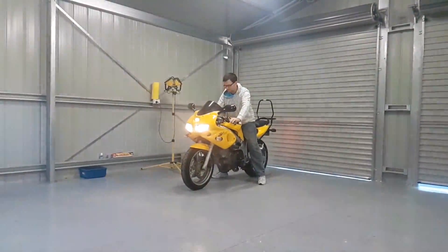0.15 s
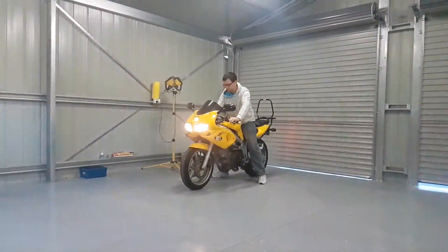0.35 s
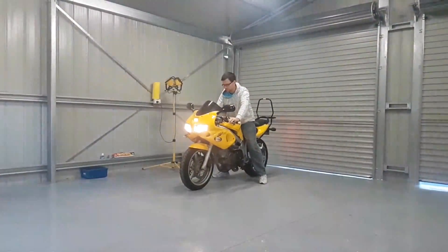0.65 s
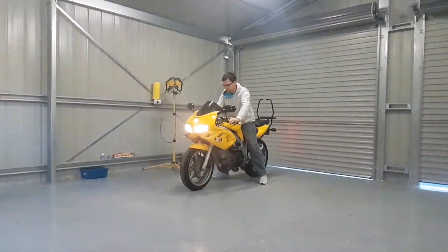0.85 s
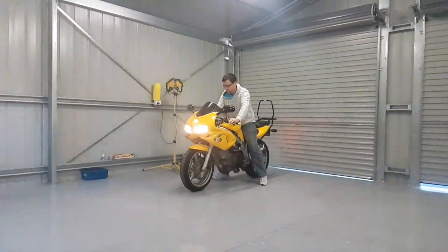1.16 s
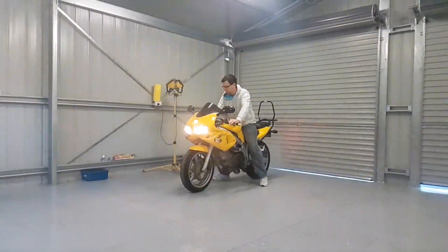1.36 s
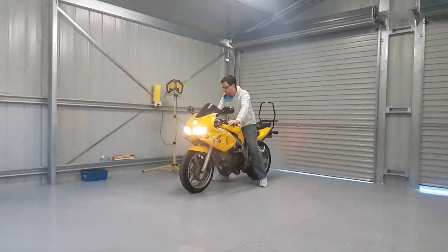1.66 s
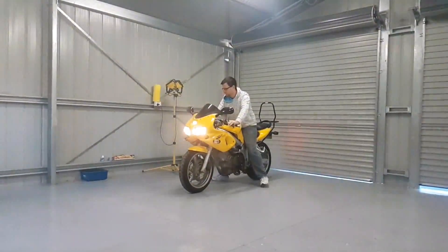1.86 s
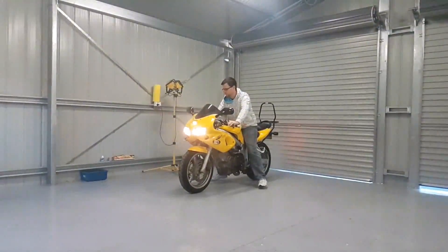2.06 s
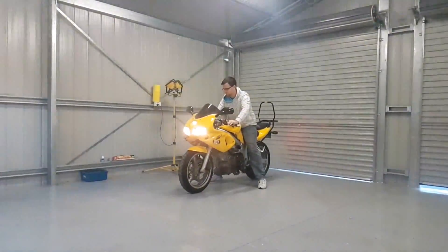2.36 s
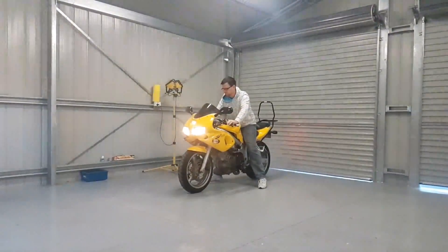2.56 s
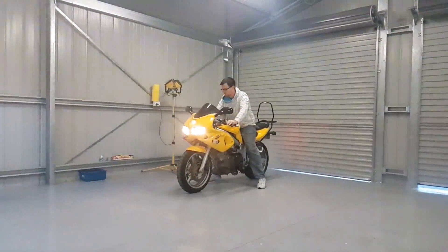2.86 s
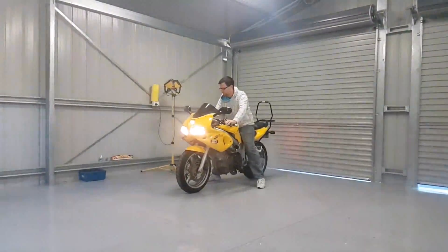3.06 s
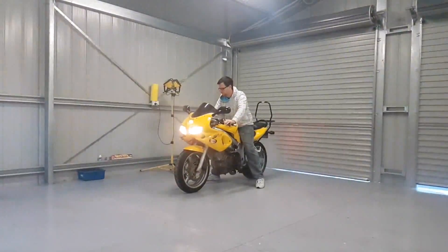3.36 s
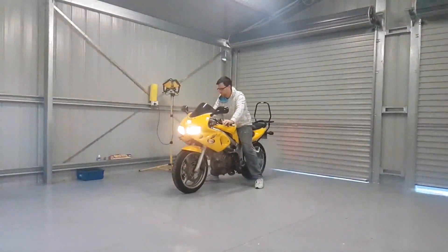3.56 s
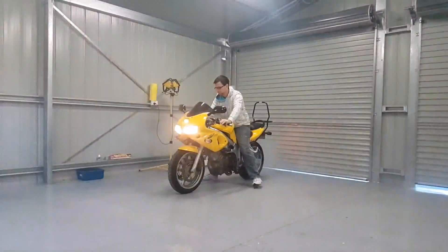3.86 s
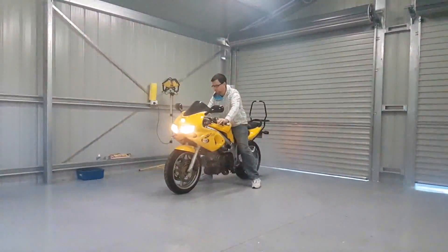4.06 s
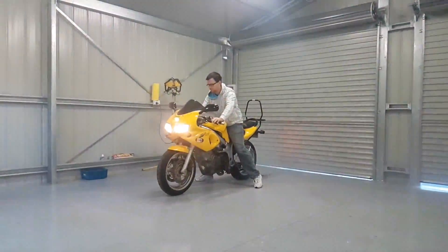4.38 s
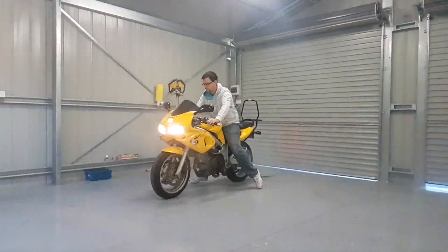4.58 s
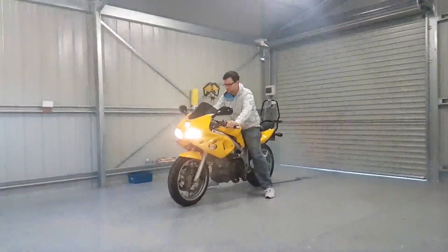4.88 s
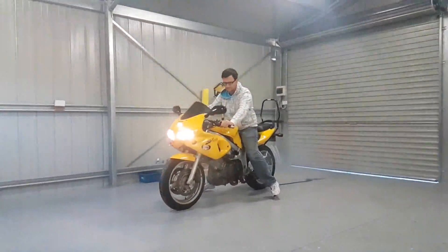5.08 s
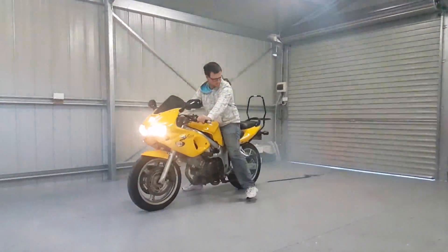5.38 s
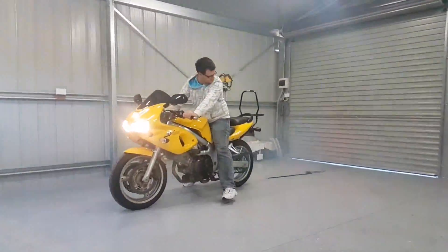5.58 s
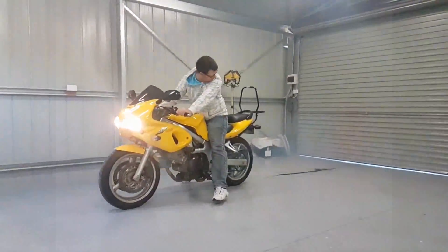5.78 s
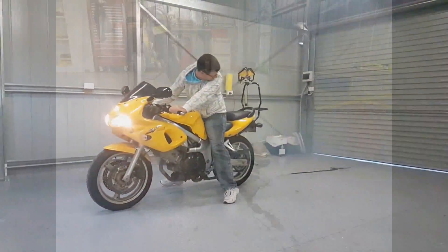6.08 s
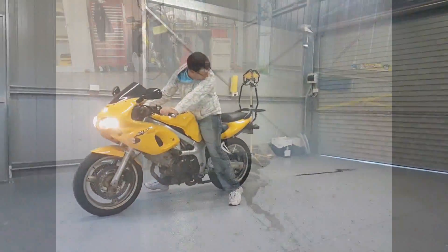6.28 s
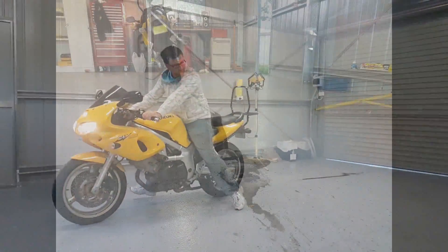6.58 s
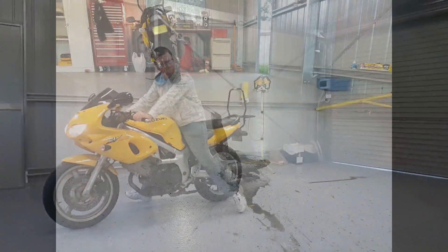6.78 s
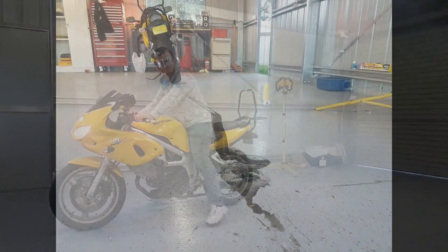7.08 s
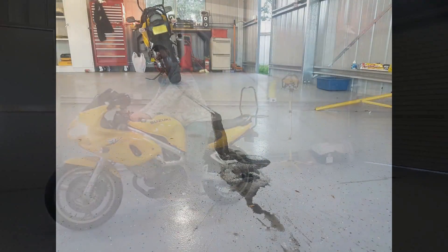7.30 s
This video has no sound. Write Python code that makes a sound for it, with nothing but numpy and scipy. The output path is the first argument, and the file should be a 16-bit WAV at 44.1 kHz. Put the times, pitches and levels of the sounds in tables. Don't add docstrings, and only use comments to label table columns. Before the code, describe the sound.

Harsh, wavering high-rev motorcycle roar with rubber hiss, a short tyre screech as the throttle shuts, a sputtering rundown, then a brief clattering idle.

```python
import sys
import numpy as np
from scipy import signal
from scipy.fft import rfft, irfft, next_fast_len
from scipy.io import wavfile

SR = 44100
rng = np.random.default_rng(int(sys.argv[2]) if len(sys.argv) > 2 else 0)


def linear_from_db(decibels):
    return 10 ** (np.asarray(decibels, float) / 20)


def unload_wav(signal):
    wavfile.write(
        sys.argv[1],
        SR,
        np.round(np.clip(np.atleast_2d(signal).T, -1, 1) * 32767).astype(np.int16),
    )


N = 328104
TIME = np.arange(N) / SR
SHUT_S, SKID_S, GRIP_S = 4.46, 4.385, 4.916


def rms_one(x):
    return x / np.sqrt(np.mean(x ** 2) + 1e-20)


def in_time(rows):
    s, *columns = np.transpose(rows)
    return [np.interp(TIME, s, column) for column in columns]


def at_hz(points, hz):
    points = np.array(points)
    return np.interp(np.log(hz), np.log(points[:, 0] + 1), points[:, 1])


def between(start_s, stop_s, fade_s):
    return np.clip(np.minimum(TIME - start_s, stop_s - TIME) / fade_s, 0, 1)


def drift(rate_hz, step=40):
    r = np.exp(-2 * step * np.pi * rate_hz / SR)
    chance = rng.standard_normal(N // step + 2002)
    slow = signal.lfilter([1], [1, -2 * r, r * r], chance)[2000:]
    return np.interp(np.arange(N) / step, np.arange(len(slow)), rms_one(slow))


def resonance_gain(modes, hz):
    power = 0
    for at, width, db in modes:
        power = power + linear_from_db(2 * db) / (1 + (2 * (hz - at) / width) ** 2) ** 2
    return np.sqrt(power)


def ring(clicks, hz, t60):
    fade = t60 * SR / np.log(1000)
    r, w = np.exp(-1 / fade), 2 * np.pi * hz / SR
    top, bottom = [0, np.sin(w)], [1, -2 * r * np.cos(w), r * r]
    once = signal.lfilter(top, bottom, clicks + 1e-18)
    return signal.lfilter(top, bottom, once) * 2 * np.e / fade


# f/Hz, level/dB
SIDE_LEAN = [(60, -4), (110, 0.5), (200, -1.5), (380, 2), (700, -2), (1290, -3.5), (2380, -6.5),
             (4400, -5.5), (8120, -4), (15000, 3.5)]


def sides(hz):
    return linear_from_db(np.multiply.outer([.5, -.5], at_hz(SIDE_LEAN, hz)))


# f/Hz, likeness (1 = same, 0 or below = unrelated)
SIDE_LIKENESS = [(60, -0.33), (180, 1), (550, 0.47), (1650, -0.075), (4970, 0.037), (15000, -0.41)]


def banded_noise(colour, anchors_hz, levels_db, throb_db, patchy_db):
    edges_hz = np.r_[25, 50, 100 * 2 ** np.arange(0, 4, .5), 1450 * 2 ** np.arange(0, 3.7, 1 / 3)]
    out, together = 0, drift(6.0)
    white = rng.standard_normal((2, 2, N))
    for k, (low, high) in enumerate(zip(edges_hz, edges_hz[1:])):
        sos = signal.butter(2, [low, high], "band", fs=SR, output="sos")
        mid, side = signal.sosfilt(sos, white[k % 2])
        hz = np.sqrt(low * high)
        level_db = at_hz(colour, hz)
        for row, db in zip(np.eye(len(anchors_hz)), levels_db):
            level_db = level_db + np.interp(np.log(hz), np.log(anchors_hz), row) * db
        flicker_db = patchy_db * (0.21 * together + drift(33.0))
        flicker_db = flicker_db + throb_db * np.clip(np.log2(hz / 150) / 4, 0, 1)
        alike = np.clip(at_hz(SIDE_LIKENESS, hz), 0, .98)
        pair = np.sqrt(1 + alike) * mid + np.sqrt(1 - alike) * side * [[1], [-1]]
        out = out + linear_from_db(level_db + flicker_db) * sides(hz)[:, None] * pair
    return out


def rev_limit(rate):
    return np.clip((rate - 82.5) / 3, 0, 1)


# t/s, f/Hz (engine cycles per second)
FULL_REVS = [(0.0, 78.0), (0.23, 81.7), (0.97, 81.1), (1.14, 77.0), (1.45, 86.8), (1.57, 84.0),
             (1.64, 79.2), (1.98, 77.5), (2.25, 72.0), (2.43, 73.0), (2.87, 82.1), (3.05, 75.4),
             (3.33, 85.6), (3.48, 87.1), (3.53, 81.5), (3.88, 75.9), (4.41, 76.4), (4.45, 75.3)]
# t/s, f/Hz (engine cycles per second)
RUNDOWN_REVS = [(4.45, 75), (4.63, 63.5), (4.78, 53.5), (4.9, 42), (5.05, 32), (5.22, 25), (5.43, 16.5),
                (5.6, 13), (5.8, 10)]


def crank():
    hunt_from_s, hunt_period_s, hunt_hz = 3.69, .215, .9
    rate = in_time(FULL_REVS + RUNDOWN_REVS[1:])[0]
    hunt = np.sin(2 * np.pi * (TIME - hunt_from_s) / hunt_period_s)
    rate = rate + hunt_hz * between(hunt_from_s, SHUT_S, .1) * hunt
    stumble = rev_limit(rate)
    rate = rate * (1 + .0018 * drift(12.0) + .019 * stumble * drift(25.0))
    return rate, 2 * np.pi * np.cumsum(rate) / SR


# f/Hz, width/Hz, level/dB
PIPE_RESONANCES = [(80.4, 8.5, -5.5), (388.5, 11.1, 5.5), (368.5, 15, 3.5), (427, 26, 3), (559, 120, -2.5),
                   (576, 18, 4), (617, 20, -3), (652, 22, -2), (692, 25, -2), (737, 28, 4), (784, 22, -0.5),
                   (855, 84, -7), (920, 25, -5), (964, 99, -4.5), (1000, 34, -5), (1270, 6.6, -13),
                   (1386, 56, -8), (1465, 38, -8.5), (1566, 46, -16), (1744, 43, -21), (1854, 73, -9),
                   (1987, 74, -11.5), (2107, 36, -11), (2267, 180, -14), (1570, 740, -14)]
# f/Hz, width/Hz, level/dB
LOW_RESONANCES = [(144.7, 6, -15.5), (153.85, 4.4, -17.5), (160.5, 9.4, -14), (171.6, 7.5, -13.5),
                  (220.5, 14.06, -9.5), (246.4, 3.5, -16.5), (253, 14, -20), (296, 25, -24),
                  (308.4, 11, -17.5), (326.6, 12, -10.5), (346, 11, -28), (441, 18, -18.5),
                  (463.4, 25.5, -15), (492.6, 8.4, -22.5)]
FIRING_BALANCE = {7: -7, 8: 3, 9: -2, 10: -10, 13: -3, 14: -3}


def exhaust(rate, angle):
    out = np.zeros((2, N))
    for k in range(1, 31):
        strong = k in (2, 3, 4, 6)
        modes = LOW_RESONANCES if strong else PIPE_RESONANCES
        level_db = 5.5 if strong else -15 + FIRING_BALANCE.get(k, 0)
        gain = linear_from_db(level_db) * np.repeat(resonance_gain(modes, k * rate[::32]), 32)[:N]
        wobble = linear_from_db((1.6 + k / 10) * drift(8.0))
        apart = min(.03 * k * (1 + k / 8), .6) * (-1) ** k
        start = rng.uniform(0, 2 * np.pi)
        tone = np.sin(k * angle + start + np.array([[apart], [-apart]]))
        out += gain * wobble * sides(78 * k)[:, None] * tone
    return between(-1, SHUT_S, 0.13) * out


# t/s, level/dB
ENGINE_LOAD = [(0.0, -23), (0.99, -23.5), (1.04, -26), (1.42, -25), (2.48, -28), (2.53, -25), (3.03, -26),
               (3.44, -24), (3.63, -27.5), (4.3, -26.5)]
# share of load swing, rev-limit level/dB, skid level/dB, early fall before grip t/s,
# fall dB/s
ROAR_PARTS = [
    (.1, 8.5, 5, 0.97, 9),
    (.2, 3, 1.5, 0.1, 93),
    (.9, 0, 1.5, .17, 76),
    (.9, 3, 10, 0.04, 130),
    (.9, 2, 9.5, 0.017, 200),
]
# level/dB at the grip, fall dB/s
ROAR_ECHOES = [
    (-5.5, 30),
    (-12.5, 13.5),
    (-14, 21),
    (-7.5, 24),
    (-16, 31),
]


def roar_levels(rate):
    load_db = in_time(ENGINE_LOAD)[0]
    load_db = (load_db - np.median(load_db[:4 * SR])) * (TIME < SKID_S)
    skid, after_s = between(SKID_S, 9, 0.0077), np.maximum(TIME - GRIP_S, 0)
    levels = []
    for part, (tail_db, tail_fall) in zip(ROAR_PARTS, ROAR_ECHOES):
        share, limit_db, skid_db, early_s, fall = part
        direct_db = share * load_db + limit_db * rev_limit(rate) + skid_db * skid
        direct_db = direct_db - fall * np.maximum(TIME - GRIP_S + early_s, 0)
        tail_db = tail_db - tail_fall * after_s
        levels.append(10 * np.log10(linear_from_db(2 * direct_db) + linear_from_db(2 * tail_db)))
    levels[0] = levels[0] + 6 * np.exp(-((TIME - 4.665) / .045) ** 2)
    return levels


# f/Hz, level/dB per Hz
ROAR_TONE = [(25, -38), (60, -17), (150, -10.5), (300, -7), (600, -7.5), (1100, -13), (2000, -8.5),
             (2600, -14), (3300, -16), (4100, -23.5), (5200, -32), (6500, -28.5), (9000, -38), (13000, -37),
             (16000, -37.5)]


def roar(rate, angle):
    throb_db = 0.51 * (np.cos(2 * angle) + 0.5 * np.cos(angle + 1))
    anchors_hz = [250, 800, 3400, 8000, 14000]
    noise = banded_noise(ROAR_TONE, anchors_hz, roar_levels(rate), throb_db, patchy_db=.8)
    return linear_from_db(3.5) * between(-1, 5.8, .3) * noise


# skidding f/Hz, gripped f/Hz, skid level/dB, grip level/dB, fall dB/s
TREAD_BANDS = [
    (2200, 2095, -24.5, -10, 34.5),
    (4200, 3880, -24.5, -17, 42),
    (6700, 6100, -23.5, -28, 45),
]
TREAD_WIDTHS = [173, 340, 500]


def screech():
    out = 0
    grown = np.clip((TIME - SKID_S) / (GRIP_S - SKID_S), 0, 1)
    sag = np.clip((TIME - GRIP_S) / .3 + 1, 0, 1)
    for (skid_hz, grip_hz, skid_db, grip_db, fall), width in zip(TREAD_BANDS, TREAD_WIDTHS):
        hz = skid_hz + (grip_hz - skid_hz) * sag
        db = skid_db + (grip_db - skid_db) * grown - fall * np.maximum(TIME - GRIP_S, 0)
        sos = signal.butter(2, width, fs=SR, output="sos")
        real, imag = signal.sosfilt(sos, rng.standard_normal((2, 2, N)))
        angle = 2 * np.pi * np.cumsum(hz) / SR
        band = rms_one(real * np.cos(angle) + imag * np.sin(angle))
        out = out + linear_from_db(db + 1 + .5 * drift(15.0)) * sides(hz) * band
    return between(4.375, 9, .02) * between(0, 6.25, .6) * out


# f/Hz, level/dB, time to fall 60 dB t/s
COASTING_MODES = [(68, -9.5, 0.049), (101.6, -11, 0.14), (130.3, -0.5, 0.093), (156, 2, 0.032),
                  (259, -13.5, 0.12), (316, -9, 0.079), (394, -12, 0.042)]


def coasting(angle):
    turns, puffs = angle / (2 * np.pi), 0
    for lag in (0, 3 / 8):
        puffs = puffs + (np.diff(np.floor(turns - lag), prepend=0) > 0)
    puffs = puffs * linear_from_db(-20 + 1.5 * rng.standard_normal(N))
    puffs = puffs * between(4.72, 9, .09) * between(0, 5.7, .14)
    out = 0
    for k, (hz, db, t60) in enumerate(COASTING_MODES):
        out = out + (-1) ** k * linear_from_db(db) * ring(puffs, hz, t60)
    return out


# delay t/s, level/dB, spread/dB
CYCLE_THUDS = [
    (0, 0, .6),
    (.037, -2, 1.0),
    (.072, -11, 3),
]
# t/s, level/dB
IDLE_SWELL = [(5.65, -19), (5.8, -9.5), (6.0, -5.5), (6.25, 0.5), (6.65, -3), (7.05, -10), (7.25, -15),
              (7.44, -22.5)]


def idle_firings():
    from_s, cycle_s, jitter_s = 5.676, .1107, .002
    chance = rng.standard_normal((16, len(CYCLE_THUDS), 2))
    delay_s, thud_db, spread_db = np.transpose(CYCLE_THUDS)
    s = from_s + cycle_s * np.arange(16)[:, None] + delay_s + jitter_s * chance[..., 0]
    db = -2.5 + np.interp(s, *np.transpose(IDLE_SWELL)) + thud_db + spread_db * chance[..., 1]
    return np.minimum(s.ravel(), (N - 1) / SR), db.ravel()


# f/Hz, level/dB, time to fall 60 dB t/s, arrival lag t/s
IDLE_CHAMBERS = [(75, -7, .06, 0), (102, -3, .06, .002), (126, 0, .08, .005), (160, -1.5, .05, .010),
                 (205, -7, .04, .014), (122, -15, .25, .002), (310, -18, .05, .012), (420, -26, .05, .012)]
# f/Hz, level/dB per Hz
CLATTER_TONE = [(120, -32), (200, 7), (273, -14), (311, -1), (360, -17), (416, -12), (509, -22.5),
                (2210, -26), (3560, -37), (9500, -48), (13000, -56), (16000, -55)]


def idle():
    s, db = idle_firings()
    spread_db = .8 * rng.standard_normal((len(s), len(IDLE_CHAMBERS)))
    thump, puffs = 0, np.zeros(N)
    for k, (hz, mode_db, t60, lag_s) in enumerate(IDLE_CHAMBERS):
        clicks = np.zeros(N)
        at = ((s - .018 + lag_s) * SR).astype(int)
        clicks[at] = linear_from_db(db + mode_db - 4.5 + spread_db[:, k])
        thump = thump + (-1) ** k * ring(clicks, hz, t60)
    puffs[((s - .008) * SR).astype(int)] = 1
    flare_db = 4.3 * signal.lfilter([1], [1, -np.exp(-1 / (0.0092 * SR))], puffs)
    levels_db = [share * in_time(IDLE_SWELL)[0] for share in (1, 0.9, 0.97)]
    colour = [(25, -46), (120, -3)] + CLATTER_TONE[1:]
    clatter = banded_noise(colour, [500, 2000, 8000], levels_db, flare_db, patchy_db=.6)
    return thump, linear_from_db(-1.0) * between(5.62, 9, 0.083) * clatter


def garage(x):
    t60_s, wall_cut_hz = 1.3, 3500
    size = next_fast_len(N + 2 * SR)
    w = 2 * np.pi * np.arange(size // 2 + 1) / size
    dull = 1 / (1 + 1j * w * SR / (2 * np.pi * wall_cut_hz)) ** 0.35
    response = np.zeros((2, len(w)), complex)
    lags = (rng.uniform(.025, .065, 16) * SR).astype(int)
    for k, lag in enumerate(lags):
        loop = linear_from_db(-60 * lag / SR / t60_s) * dull * np.exp(-1j * w * lag)
        response[k % 2] += loop / (1 - loop) * (-1) ** (k // 2)
    return irfft(rfft(x, size) * response, size)[:, :N] / 4


def scene():
    rate, angle = crank()
    tones, putter = exhaust(rate, angle), coasting(angle)
    thump, clatter = idle()
    echoes = garage(linear_from_db(-12) * (tones.mean(axis=0) + putter) + linear_from_db(-15) * thump)
    return tones + putter + roar(rate, angle) + screech() + thump + clatter + echoes


def band_limit(x):
    return signal.sosfilt(signal.butter(12, 16190, fs=SR, output="sos"), x)


def record(dry):
    heard = signal.sosfilt(signal.butter(2, 45, "high", fs=SR, output="sos"), dry)
    rounded = .985 * np.tanh(heard / .985)
    rounded = signal.sosfilt(signal.cheby2(12, 60, 16260, fs=SR, output="sos"), rounded)
    mix = np.clip(rounded - rounded.mean(), -1, 1)
    return band_limit(mix)


dry = scene()
out = record(dry)
unload_wav(out)
```